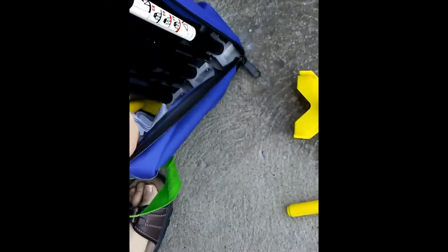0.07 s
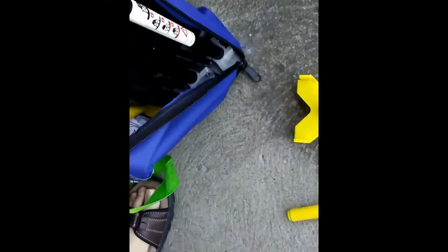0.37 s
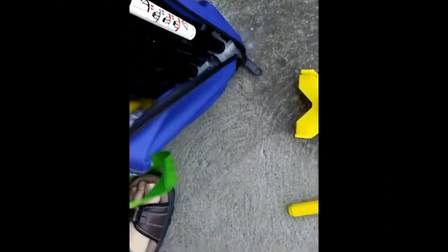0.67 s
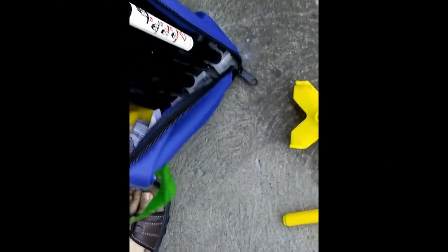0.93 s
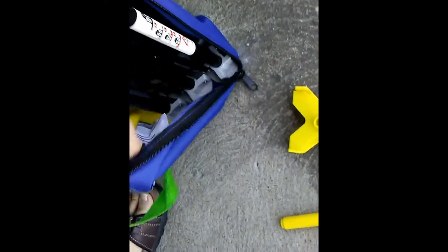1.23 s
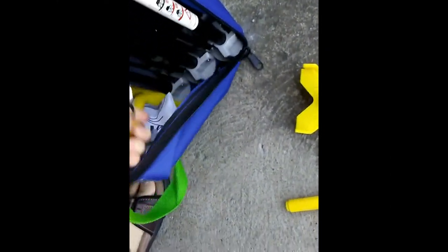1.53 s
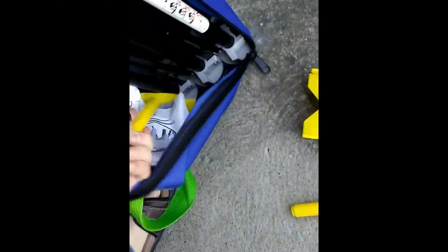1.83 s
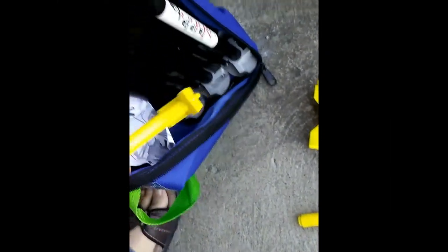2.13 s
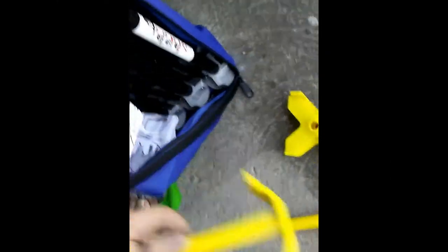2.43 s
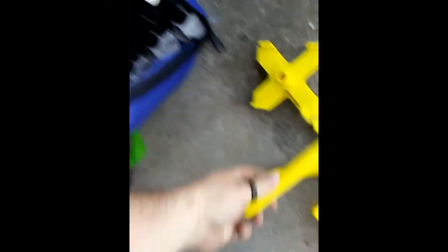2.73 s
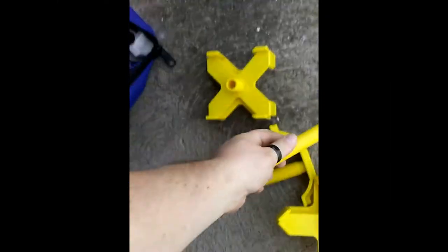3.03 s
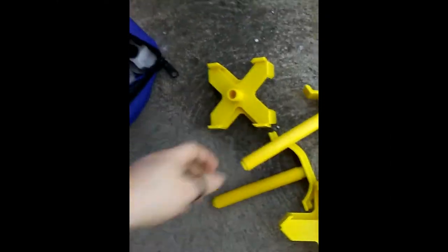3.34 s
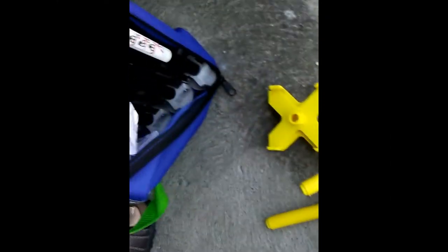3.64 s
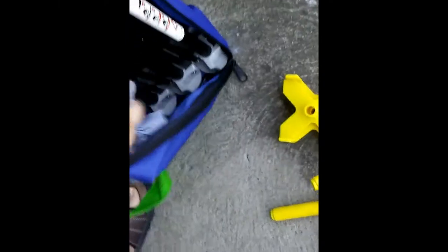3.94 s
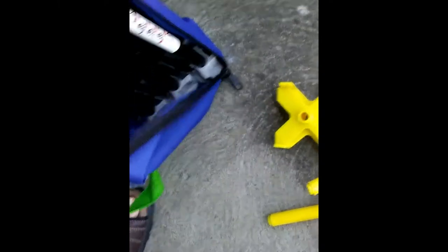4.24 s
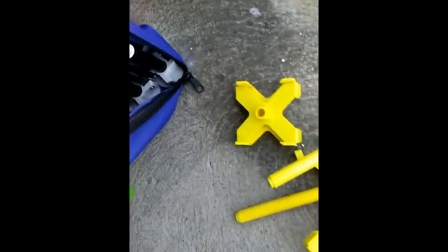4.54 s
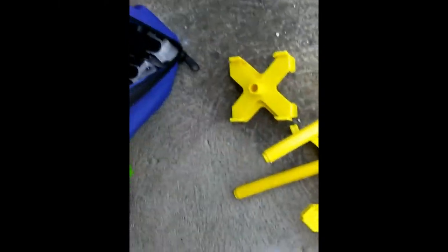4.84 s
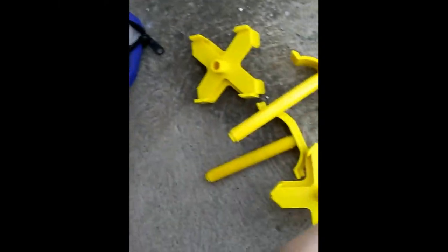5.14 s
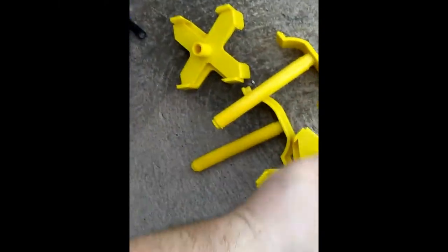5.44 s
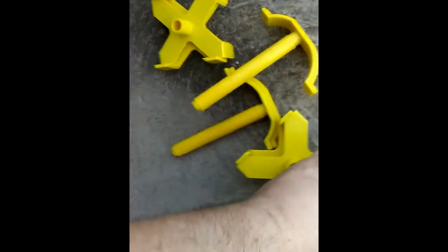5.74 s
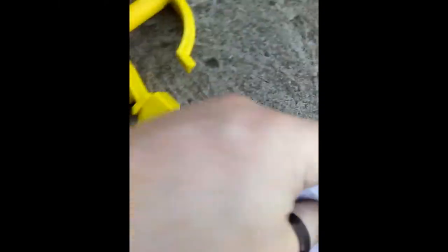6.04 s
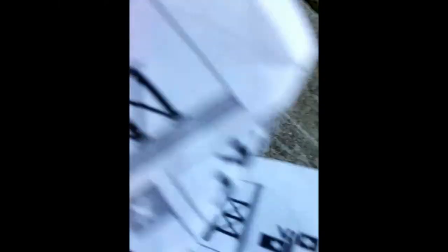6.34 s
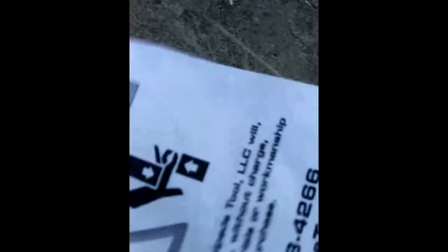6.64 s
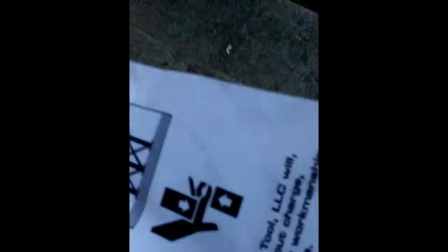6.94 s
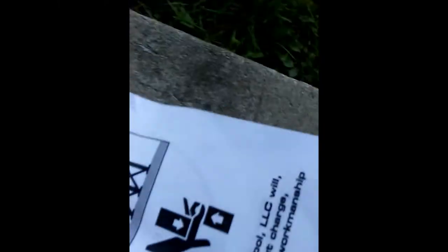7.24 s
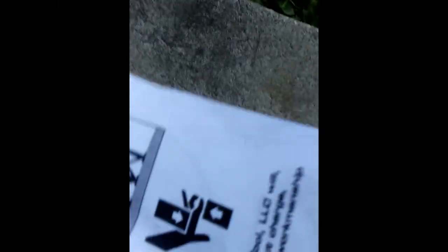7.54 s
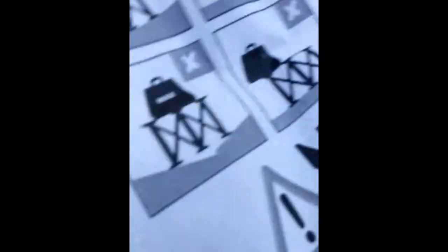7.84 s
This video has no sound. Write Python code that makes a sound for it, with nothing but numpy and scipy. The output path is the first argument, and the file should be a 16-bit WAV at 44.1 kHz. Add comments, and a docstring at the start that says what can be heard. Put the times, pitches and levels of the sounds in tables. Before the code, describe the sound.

Someone rummages through a nylon bag at close range, making hollow plastic pieces clack, rattle and slide against each other. Midway, one piece bounces briefly on concrete, and then the knocking grows busier. Near the end, a sheet of paper crinkles and scuffs right on the microphone, with low wind buffeting. Soft open-air noise, a faint wavering hum and a few far-off bird chirps lie underneath.

```python
"""Outdoors on concrete, a hand tugs plastic and steel sawhorse parts out of a nylon bag. Impacts excite
the parts' damped modes, sliding makes them scrape by stick-slip, and the bag rustles, ticks and rumbles.
One part is set down and chatters to rest. Then a paper sheet is pulled out, crackling and brushing the
microphone while turbulent gusts buffet it. A distant bird and a low hum lie in the background."""
import sys
import numpy as np
from scipy import signal
from scipy.fft import rfft, irfft, next_fast_len
from scipy.io import wavfile
from scipy.ndimage import uniform_filter1d

SR = 44100
rng = np.random.default_rng(int(sys.argv[2]) if len(sys.argv) > 2 else 0)


def to_wav(s):
    """Save 16-bit WAV."""
    ch = np.atleast_2d(s).T  # columns
    pcm = np.round(np.clip(ch, -1, 1) * 32767)  # PCM
    wavfile.write(sys.argv[1], SR, pcm.astype(np.int16))


N = 352359

# Parts colliding. Each row: start in seconds, level in dB, bass lift in dB, treble lift in dB.
KNOCKS = [(0.023, -19, -26, 5), (0.326, -12.5, -1, 6.5), (1.738, -12.5, 4.5, 11.5), (1.879, -16, 6, 1),
          (1.928, -13, -0.5, 0), (1.945, -14, 5, 7), (1.998, -14, 6, 7.5), (3.82, -21.5, 9, 6.5),
          (3.881, -19, -1, 6), (3.92, -16.5, -5, 7), (3.933, -19, -6, 7), (4.11, -17.5, -12, -10),
          (4.133, -18.5, -10, 0), (4.406, -22.5, 7, -16), (4.66, -16.5, -2, -7), (4.703, -11, -6, 4),
          (4.759, -17, -12, -19), (4.863, -25, 6, -12), (4.982, -15.5, 3, -26), (5.186, -18.5, -34, -32),
          (5.288, -15.5, 9.5, -22), (5.314, -11, 6, 5.5), (5.337, -13, -12, -15), (5.37, -22.5, 13, -16),
          (5.438, -13.5, 1, 11), (5.453, -13, 6, -22), (5.621, -11, 6, 1.5), (5.782, -14.5, 1.5, 6),
          (5.972, -15, 10, -5), (6.039, -12.5, 7.5, 8), (6.091, -11.5, 2, -1), (6.215, -14.5, 14, -4)]
# Parts sliding. Each row: centre in seconds, level in dB, half length in seconds, treble lift in dB.
SCRAPES = [(0.658, -22, 0.0043, -4), (1.137, -11, 0.0036, 4), (1.955, -12.5, 0.0013, 7.5),
           (2.170, -17.5, 0.0075, 10), (2.700, -25, 0.0074, -1), (3.776, -14.5, 0.0086, -5),
           (4.062, -10.5, 0.0025, 2), (5.872, -18, 0.0038, -12), (6.144, -13, 0.005, 4)]
# Response of a hollow plastic body. Each row: frequency in Hz, gain in dB.
PLASTIC_SPECTRUM = [(120, -10.5), (1080, 0.5), (1400, -1.5), (1870, 7.5), (2760, 8.5), (3500, 0.5),
                    (9130, -6), (12000, -15)]
# Dull blows on hollow parts. Each row: start in seconds, level in dB, frequency in Hz.
BUMPS = [(0.737, -27, 120), (2.426, -42.5, 630), (2.696, -32, 324), (2.945, -26.5, 79.6),
         (5.313, -27.5, 70.6), (5.558, -26.5, 850), (5.804, -18, 780), (5.943, -21.5, 830),
         (7.902, -19.5, 543)]
# Modes of the part set on concrete. Each row: frequency in Hz, weight in dB.
PART_MODES = [(619, -3), (860, -1), (1427, 2), (1529, 8), (2056, 7), (2191, 0), (2832, -12)]
# Its clack. Each row: frequency in Hz, gain in dB.
CLACK_SPECTRUM = [(450, -20), (1100, -1), (2800, 7.5), (4300, -19.5), (12000, -28)]
# Its bounces. Each entry: moment of contact in seconds.
BOUNCES_S = [3.098, 3.106, 3.122, 3.152, 3.168, 3.19, 3.225]
# Loose parts stirred by the hand. Each row: start in seconds, length in seconds, level in dB.
JOSTLES = [(2.92, 0.08, -48.5), (4.71, 0.076, -37.5), (5.15, 0.424, -37)]

# Tugs dragging nylon over the parts. Each row: start in seconds, length in seconds, level in dB.
TUGS = [(0.01, 0.49, -36), (0.61, 0.15, -34), (0.87, 0.19, -33.5), (1.15, .19, -32.5), (1.44, 0.61, -37),
        (1.85, 0.17, -27.5), (2.06, 0.12, -34.5), (2.26, 0.1, -55.5), (2.66, 0.089, -45),
        (3.67, 0.26, -37.5), (3.77, 0.13, -32), (4.0, 0.22, -26), (4.42, 0.11, -37.5), (4.68, 0.31, -36.5),
        (5.14, 0.44, -36.5), (5.77, 0.39, -32)]
# Light ticks and small knocks in the bag. Each row: start in seconds, level in dB.
BAG_TICKS = [(0.216, -26.5), (0.56, -28.5), (0.979, -27), (1.044, -31.5), (1.226, -22), (1.264, -23),
             (1.478, -25), (3.865, -21.5), (4.043, -22), (4.19, -18.5)]
# Response of the bag. Each row: frequency in Hz, gain in dB.
NYLON_SPECTRUM = [(88, -61.5), (200, -6.5), (360, 3), (608, -10), (970, 2), (1440, -4), (2660, 4),
                  (4920, -8), (8460, -6), (12000, -17.5)]

# Paper sliding through the fingers. Each row: start in seconds, length in seconds, level in dB.
PULLS = [(5.205, 0.044, -29.5), (6.172, 0.018, -24), (6.29, 0.077, -30.5), (6.39, 0.048, -21),
         (6.49, 0.13, -32), (6.82, 0.33, -35.5), (7.232, 0.035, -32.5), (7.31, .16, -32), (7.51, 0.35, -35),
         (7.81, 0.14, -26)]
# Its friction hiss. Each row: frequency in Hz, gain in dB.
PAPER_SPECTRUM = [(300, -2), (900, -5), (1900, 0), (3500, -7.5), (8500, -3.5), (13000, -15)]
# Spells of paper crackle. Each row: start in seconds, length in seconds, level in dB.
CRUMPLES = [(6.48, 0.32, -25.5), (6.82, 0.39, -25), (7.38, 0.43, -22.5)]
# Creases snapping. Each row: start in seconds, level in dB.
CREASES = [(6.48, -15), (6.509, -6.5), (6.601, -11.5), (6.663, -13), (6.686, -12), (6.826, -8.5),
           (6.906, -10.5), (7.069, -17), (7.345, -15), (7.43, -10), (7.568, -14), (7.585, -9.5)]
# Paper on the microphone. Each row: start in seconds, level in dB, length in seconds, treble lift in dB.
SCUFFS = [(6.45, -9, 0.0086, 18), (6.505, -8.5, 0.026, -4), (6.601, -11.5, 0.047, 2),
          (6.642, -9.5, 0.02, 0), (6.682, -6.5, 0.041, -9.5), (6.791, -15, 0.018, -16),
          (6.815, -8, 0.027, 1.5), (6.848, -10.5, 0.027, 0.5), (6.888, -10.5, 0.026, -14),
          (7.01, -10, 0.01, -14), (7.04, -11, 0.031, -11), (7.153, -12.5, 0.018, 7.5),
          (7.169, -5.5, 0.01, -16), (7.345, -10.5, 0.012, -3), (7.378, -13, 0.028, 1),
          (7.498, -16.5, 0.052, -20), (7.595, -12, 0.08, -2.5), (7.692, -12, 0.047, -0.5)]
# Colour of the scuffs and crackle. Each row: frequency in Hz, gain in dB.
SCUFF_SPECTRUM = [(150, -3), (400, 3.5), (1000, -0.5), (1900, -3), (3000, -10.5), (5000, -11), (9000, -16),
                  (13000, -31)]
# The sheet bending near the microphone. Each row: centre in seconds, level in dB, frequency in Hz.
FLEXES = [(6.491, -8.5, 151.2), (6.527, -14.5, 343.6), (6.87, -5, 175.5), (6.964, -12, 444),
          (7.048, -7, 243.2), (7.113, -10.5, 298), (7.188, -11, 214), (7.257, -9.5, 126.3),
          (7.328, -7, 156.3), (7.425, -10.5, 291.6), (7.462, -7.5, 177.6), (7.518, -12, 125.3)]

# Low rumble: the bag being handled (first row), then gusts on the microphone.
# Each row: start in seconds, length in seconds, level in dB.
RUMBLES = [(1.2, 1.06, -46.5), (6.12, 0.043, -26), (6.27, 1.69, -31.5), (6.49, 0.46, -16),
           (7.0, 0.12, -17.5), (7.42, 0.33, -16.5)]
# Colour of the rumble. Each row: frequency in Hz, gain in dB.
RUMBLE_SPECTRUM = [(25, -24), (55, 2), (120, -2.5), (450, -15), (1200, -47.5)]
# Bird notes. Each row: start in seconds, level in dB, first pitch in Hz, last pitch in Hz.
CHIRPS = [(0.02, -36, 4470, 3730), (2.599, -43, 4960, 4480), (3.0, -53, 6340, 5600),
          (3.335, -49, 4560, 5320), (3.426, -49, 4080, 3400)]
# Outline of the hum. Each row: time in seconds, level in dB.
HUM_LEVELS = [(0, -53.5), (1.4, -43.5), (2.68, -37), (2.9, -45.5), (5, -52)]
# Open-air noise. Each row: frequency in Hz, gain in dB.
AIR_SPECTRUM = [(100, -7.5), (600, -15), (1500, -15.5), (12000, -30.5)]

TUG_ATTACK_S, TUG_RELEASE_T60_S = 0.041, 0.2
PULL_ATTACK_S, PULL_RELEASE_T60_S = 0.0093, 0.046


def knocks(crack_t60=0.036, ring_t60=0.035, rattle_t60=0.32, contact_s=0.00056, rebound_s=0.011):
    """Impact excitation: a crack, a short plastic ring, a rebound and the rattle of loose neighbours."""
    out, t = np.zeros(N), event_time()
    onset = 1 - np.exp(-(t / contact_s) ** 2)  # plastic yields, so the force takes time to rise
    for s, db, bass_db, treble_db in KNOCKS:
        rattle = unit(octave_ticks(len(t), rate=460, spread_db=2) * fade(t, rattle_t60))
        crack = unit(burst(crack_t60))
        ring = damped_ring(ring_t60, count=36)
        delay = int(SR * rebound_s * (.5 + rng.random()))
        rebound = np.pad(unit(burst(crack_t60 / 2)), (delay, 0))[:len(t)]
        blow = (crack + undb(-1) * ring + undb(-9) * rattle + undb(-11) * rebound) * onset
        add(out, s, peak_level(colour(blow, shelves(PLASTIC_SPECTRUM, bass_db, treble_db)), db))
    return out


def scrapes():
    """Sliding friction: as one part glides past another, the contact pressure peaks midway."""
    def glance(u):
        return np.exp(-np.abs(u) ** 1.5 / 2)
    return stick_slip(SCRAPES, PLASTIC_SPECTRUM, glance, rate=3000, spread_db=2.5)


def bumps(decay_cycles=15, band_ratio=1.28):
    """Soft impacts excite only the lowest modes; at equal damping ratio, lower ones last longer."""
    out = np.zeros(N)
    for s, db, hz in BUMPS:
        thud = band(burst(decay_cycles / hz), hz / band_ratio, hz * band_ratio)
        add(out, s, peak_level(thud, db))
    return out


def set_down(ring_t60=0.29, clack_t60=0.033, detune=0.0126, settle_s=0.0076):
    """Inelastic bounces on concrete: each is weaker, shifts the part's modes and grinds on the grit."""
    out, t = np.zeros(N), event_time()
    hz, mode_db = np.transpose(PART_MODES)
    for s in BOUNCES_S:
        strength = 1 / (1 + (s - min(BOUNCES_S)) / settle_s)
        shifted_hz = hz * np.exp(detune * rng.standard_normal(len(hz)))
        weights = undb(mode_db) * rng.standard_normal(len(hz))
        ring = np.sin(2 * np.pi * np.outer(t, shifted_hz)) @ weights * fade(t, ring_t60)
        grit = unit(rng.standard_normal(len(t)) * fade(t, ring_t60))
        clack = colour(unit(burst(clack_t60)) + undb(-12) * grit, CLACK_SPECTRUM)
        add(out, s, strength * (peak_level(ring, -26) + peak_level(clack, -14)))
    return out


def jostling():
    """Random light collisions among loose parts, filtered by their hollow bodies."""
    ticks = crackle(rate=100, spread_db=1.3, t60=0.033)
    body = shelves(PLASTIC_SPECTRUM, bass_db=8.5, treble_db=-8)
    return colour(ticks, body) * strokes(JOSTLES, TUG_ATTACK_S, TUG_RELEASE_T60_S)


def bag(uneven_db=1.5, tick_t60=0.047):
    """Friction makes the tugged nylon hiss and crinkle; light impacts tick and knock in the bag."""
    crinkles = colour(crackle(rate=90, spread_db=2.5, t60=0.02), NYLON_SPECTRUM)
    weave = colour(grains(N, rate=5000, spread_db=0.5), NYLON_SPECTRUM)
    rub = undb(-2) * weave + undb(-2.5) * crinkles
    out = rub * strokes(TUGS, TUG_ATTACK_S, TUG_RELEASE_T60_S) * undb(uneven_db * drift(50))
    for s, db in BAG_TICKS:
        tick = unit(burst(tick_t60)) + damped_ring(tick_t60)
        add(out, s, peak_level(colour(tick, NYLON_SPECTRUM), db))
    return out


def bag_resonances(x, swing_db=1.8, rate=32):
    """Cavity resonance: the bag's folds and gaps keep changing shape, so narrow peaks come and go."""
    edges_hz = np.geomspace(110, 14080, 22)
    return sum(band(x, lo, hi, order=3) * undb(swing_db * drift(rate))
               for lo, hi in zip(edges_hz, edges_hz[1:]))


def paper(uneven_db=3, snap_t60=0.022):
    """Friction on the fingers makes the sheet hiss; buckling makes it crackle and snap at its creases."""
    pull = strokes(PULLS, PULL_ATTACK_S, PULL_RELEASE_T60_S) * undb(uneven_db * drift(70))
    hiss = colour(grains(N, rate=20000, spread_db=4.5), PAPER_SPECTRUM)
    folds = colour(crackle(rate=54, spread_db=3.0, t60=0.018), SCUFF_SPECTRUM)
    out = hiss * pull + folds * strokes(CRUMPLES, PULL_ATTACK_S, PULL_RELEASE_T60_S)
    for s, db in CREASES:
        add(out, s, peak_level(band(damped_ring(snap_t60), 2000, 10700), db))
    return out


def scuffs(jerk_db=4.0):
    """Stick-slip on the microphone: the paper's edge catches at once, drags jerkily and lets go."""
    def catch(u):
        return (u >= 0) * np.exp(-np.abs(u) ** 3)
    drags = stick_slip(SCUFFS, SCUFF_SPECTRUM, catch, rate=1800, spread_db=3.0)
    return drags * undb(jerk_db * drift(300))


def flexing(half_length_s=0.027, wobble=0.123, sag_per_s=1.5):
    """Air displacement: the bending sheet pushes out short hollow buffets whose unsteady pitch sags."""
    out, lead_s = np.zeros(N), event_time().mean()
    t = event_time() - lead_s
    swell = np.exp(-(t / half_length_s) ** 2)
    for s, db, hz in FLEXES:
        whoop = tone(hz * np.exp(wobble * drift(122.2)[:len(t)] - sag_per_s * t))
        roughness = unit(band(rng.standard_normal(len(t)), hz / 2, 2.43 * hz))
        add(out, s - lead_s, peak_level((whoop + undb(-9) * roughness) * swell, db))
    return out


def rumble(uneven_db=3, breeze_db=-50):
    """Slow pressure fluctuations: over a light breeze, the handled bag, then gusts on the microphone."""
    force = undb(breeze_db) + strokes(RUMBLES, attack_s=0.024, release_t60=0.25)
    return colour(rng.standard_normal(N), RUMBLE_SPECTRUM) * force * undb(uneven_db * drift(25))


def bird(note_s=0.0555, warble=0.054, echo_t60=0.49):
    """Frequency modulation makes short warbling glides; reverberation smears them over the distance."""
    out, t = np.zeros(N), event_time()
    progress = np.minimum(t / note_s, 1)
    for s, db, from_hz, to_hz in CHIRPS:
        hz = (from_hz + (to_hz - from_hz) * progress) * np.exp(warble * drift(400)[:len(t)])
        note = np.sin(np.pi * progress) * tone(hz)
        add(out, s, peak_level(signal.fftconvolve(note, burst(echo_t60)), db))
    return out


def background(air_db=-53, hum_hz=107, waver=0.055, flutter_db=4.0):
    """Random modulation of pitch and level makes a low hum waver over faint open-air noise."""
    hum = unit(tone(hum_hz * np.exp(waver * drift(30))))
    hum_gain = curve(HUM_LEVELS) * undb(flutter_db * drift(28.08))
    return hum * hum_gain + colour(rng.standard_normal(N), AIR_SPECTRUM) * undb(air_db)


def stick_slip(table, spectrum, swell, rate, spread_db, ring_t60=0.0099):
    """Bursts of slips drive a shell's modes; swell is their envelope over time in burst lengths."""
    out, lead_s = np.zeros(N), .05
    t = event_time() - lead_s
    for s, db, length, treble_db in table:
        slips = unit(octave_ticks(len(t), rate, spread_db) * swell(t / length))
        ring = unit(signal.fftconvolve(slips, damped_ring(ring_t60))[:len(t)])
        add(out, s - lead_s, peak_level(colour(slips + ring, shelves(spectrum, 0, treble_db)), db))
    return out


def damped_ring(t60, count=48):
    """Modal superposition in a thin shell or sheet; t60 holds at 2 kHz and higher modes die sooner."""
    t = event_time()[:, None]
    hz = np.geomspace(250, 11000, count) * rng.uniform(.9, 1.1, count)
    modes = np.sin(2 * np.pi * hz * t) * fade(t, t60 * (hz / 2000) ** -.35)
    return unit(modes @ (rng.standard_normal(count) * np.sqrt(hz)))


def grains(size, rate, spread_db):
    """A Poisson process: on average rate impulses a second, a few much stronger than the rest."""
    strength = undb(spread_db * np.minimum(rng.exponential(size=size), 5))
    return unit((rng.random(size) < rate / SR) * strength * np.sign(rng.standard_normal(size)))


def octave_ticks(size, rate, spread_db):
    """Band-limited shot noise: each of seven octaves has its own random ticks."""
    return unit(sum(band(grains(size, rate, spread_db), hz, 2 * hz) for hz in 110 * 2. ** np.arange(7)))


def crackle(rate, spread_db, t60):
    """Incoherent addition: small noise snaps at random moments sum in power."""
    power = signal.fftconvolve(grains(N, rate, spread_db) ** 2, fade(event_time(), t60) ** 2)[:N]
    return unit(np.sqrt(np.abs(power)) * rng.standard_normal(N))


def strokes(table, attack_s, release_t60):
    """Gesture envelopes summed in power: each swells up to its start, holds and dies away."""
    t, power = np.arange(N) / SR, 0
    for s, length, db in table:
        swell = np.exp(-(np.minimum(t - s, 0) / attack_s) ** 2 / 2)
        release = fade(np.maximum(t - s - length, 0), release_t60)
        power = power + (undb(db) * swell * release) ** 2
    return np.sqrt(power)


def drift(rate):
    """Smoothed noise of rms 1, drawn rate times a second."""
    hold = int(SR / rate)
    steps = np.repeat(rng.standard_normal(N // hold + 1), hold)
    return unit(uniform_filter1d(uniform_filter1d(steps, hold), hold)[:N])


def colour(x, spectrum):
    """Minimum-phase filter with the given (Hz, dB) outline; output rms 1."""
    half = next_fast_len(len(x))
    hz, db = np.transpose(spectrum)
    bin_hz = np.linspace(1, SR / 2, half + 1)
    cepstrum = irfft(np.log(undb(np.interp(np.log(bin_hz), np.log(hz), db))))
    cepstrum[1:half] *= 2  # folding the cepstrum makes the filter causal
    cepstrum[half:] = 0
    return unit(irfft(rfft(x, len(cepstrum)) * np.exp(rfft(cepstrum)))[:len(x)])


def shelves(spectrum, bass_db, treble_db):
    """Shelving: raise or lower the two ends of a spectrum."""
    hz, db = np.transpose(spectrum)
    lift = np.interp(np.log(hz), np.log([800, 1600, 3200, 5500]), [bass_db, 0, 0, treble_db])
    return np.column_stack([hz, db + lift])


def band(x, lo_hz, hi_hz, order=2):
    """Band-pass filter."""
    sections = signal.butter(order, [lo_hz, min(hi_hz, SR / 2 - 1)], "band", fs=SR, output="sos")
    return signal.sosfilt(sections, x)


def tone(hz):
    """A sine whose phase is the integral of its frequency."""
    return np.sin(2 * np.pi * np.cumsum(hz) / SR)


def burst(t60):
    """Exponentially damped noise."""
    t = event_time()
    return rng.standard_normal(len(t)) * fade(t, t60)


def fade(t, t60):
    """Exponential decay, 60 dB in t60 seconds."""
    return np.exp(-np.log(1000) * t / t60)


def curve(table):
    """Gain interpolated from rows of (s, dB), zero outside their span."""
    s, db = np.transpose(table)
    return undb(np.interp(np.arange(N) / SR, s, db, left=-np.inf, right=-np.inf))


def event_time():
    """Time axis of one short sound, in seconds."""
    return np.arange(SR // 6) / SR


def undb(db):
    """Decibels to amplitude ratio."""
    return 10 ** (np.asarray(db) / 20)


def unit(x):
    """Normalise to rms 1."""
    return x / np.sqrt(np.mean(x ** 2) + 1e-18)


def peak_level(x, db):
    """Set the rms level of the loudest 4 ms."""
    return x * undb(db) / np.sqrt(uniform_filter1d(x ** 2, size=176).max())


def add(out, s, x):
    """Superpose x on out from s seconds."""
    i = int(s * SR)
    out[i:i + len(x)] += x[:max(N - i, 0)]


def scene():
    """Superposition: all sources sum at one microphone, alike in both channels."""
    parts = scrapes() + knocks() + bumps() + set_down()
    rustle = bag_resonances(bag() + jostling())
    sheet = paper() + scuffs() + flexing()
    mix = parts + rustle + sheet + rumble() + bird() + background()
    return np.array([mix, mix])


def record(dry, ceiling=0.73, top_hz=12600):
    """Soft saturation rounds the loudest peaks; a steep low-pass filter cuts the top."""
    rounded = dry / (1 + (dry / ceiling) ** 4) ** (1 / 4)
    return signal.sosfilt(signal.ellip(10, .2, 80, top_hz, fs=SR, output="sos"), rounded)


dry = scene()
out = record(dry)
to_wav(out)
```